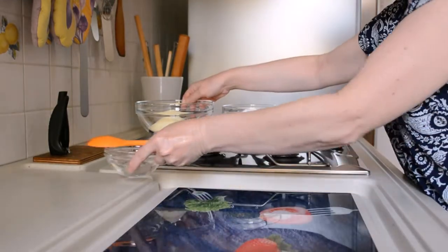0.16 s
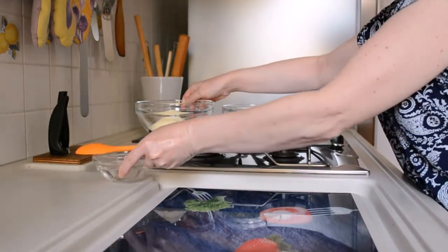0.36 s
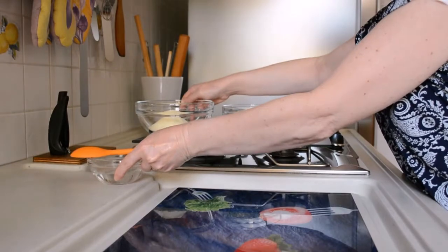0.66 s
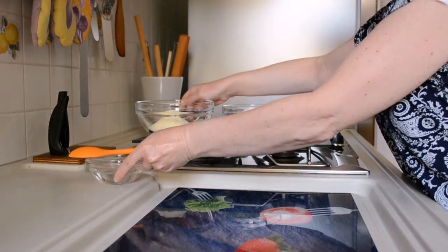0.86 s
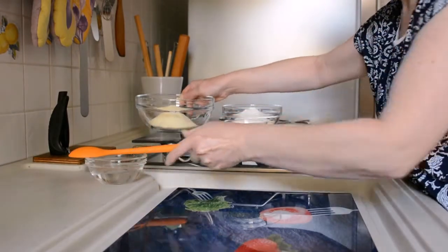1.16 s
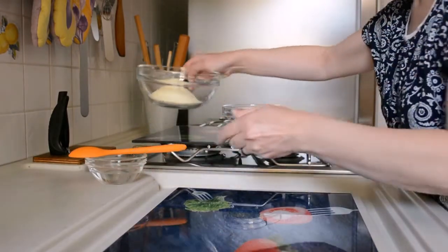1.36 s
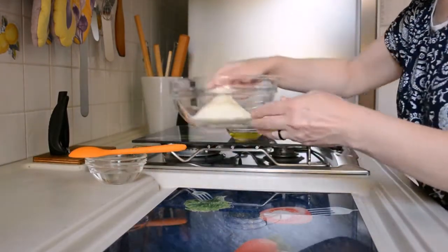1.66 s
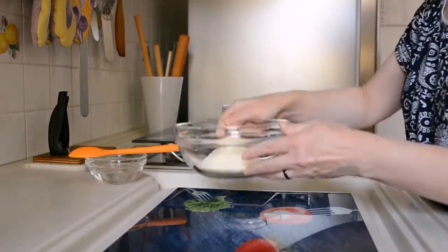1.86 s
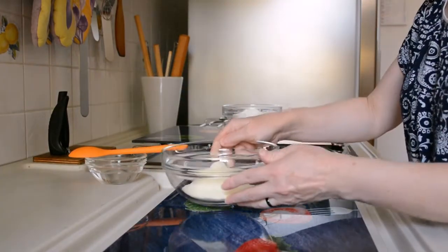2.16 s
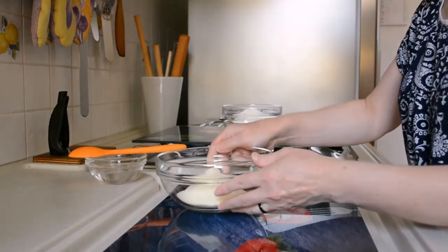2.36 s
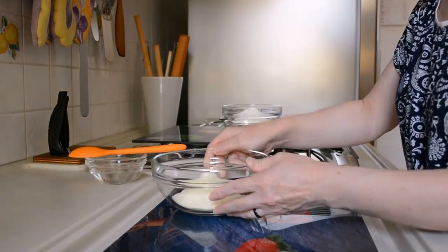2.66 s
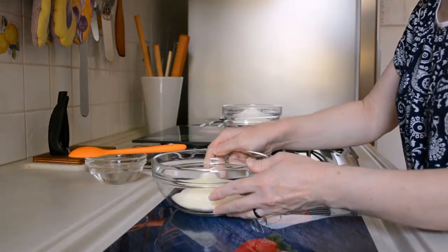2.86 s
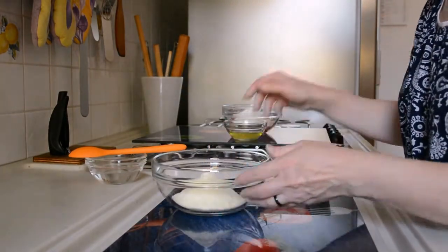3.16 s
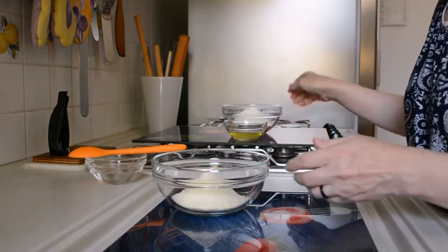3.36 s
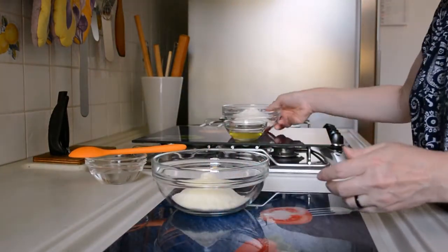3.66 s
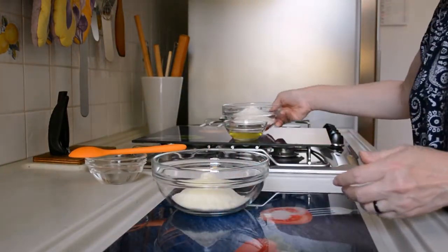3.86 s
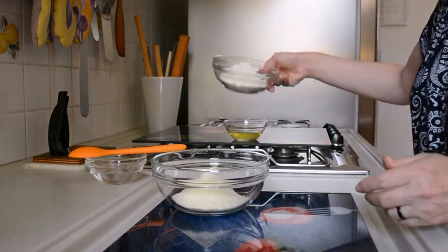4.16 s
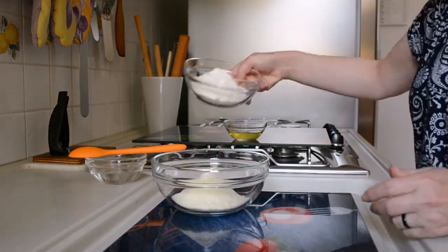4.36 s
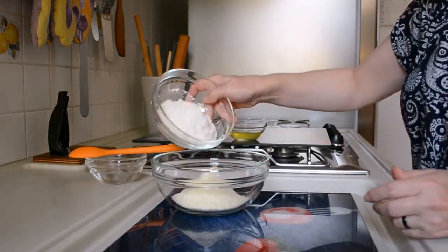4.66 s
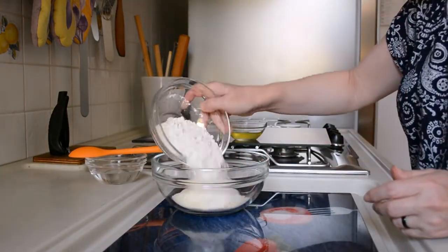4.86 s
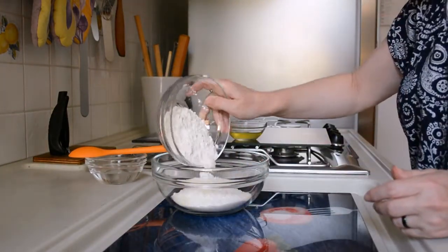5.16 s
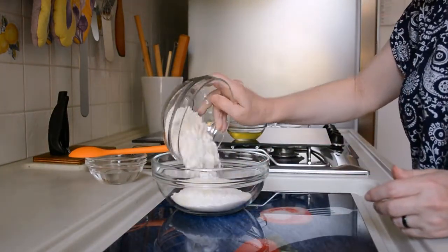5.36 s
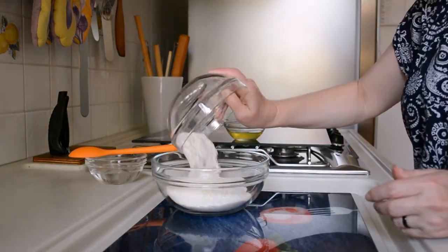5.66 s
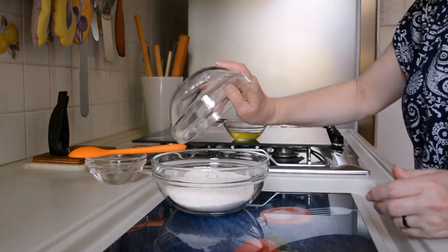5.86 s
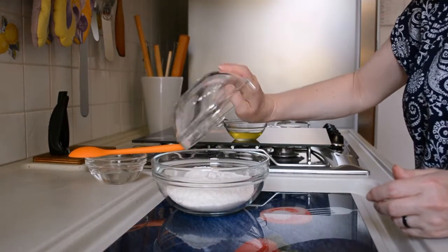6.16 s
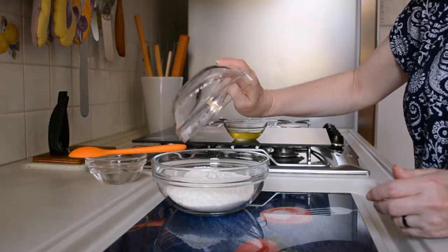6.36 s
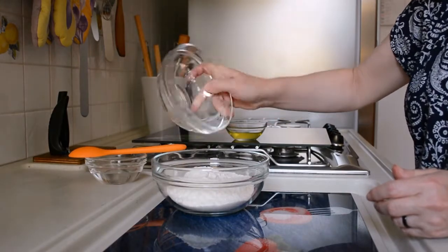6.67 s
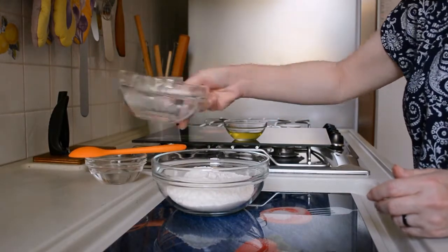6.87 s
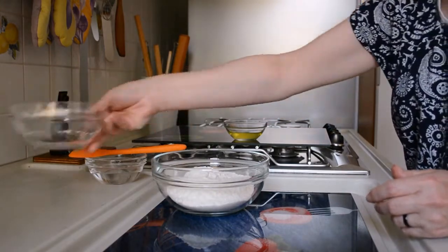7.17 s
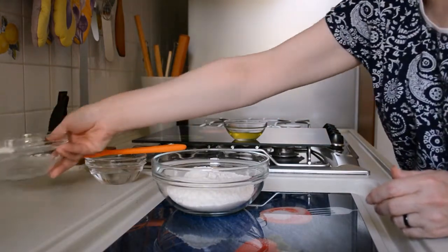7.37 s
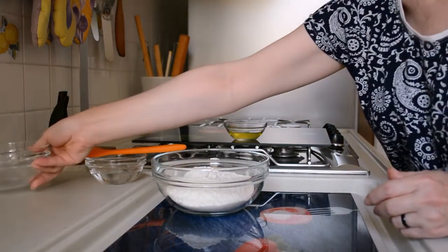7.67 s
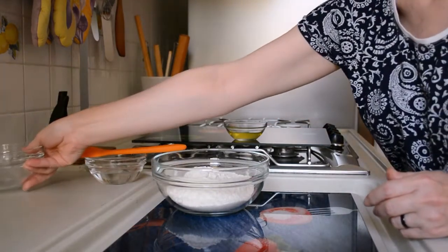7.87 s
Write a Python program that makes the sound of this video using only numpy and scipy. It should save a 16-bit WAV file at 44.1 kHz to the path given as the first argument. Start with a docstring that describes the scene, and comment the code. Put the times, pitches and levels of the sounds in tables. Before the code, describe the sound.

Over faint kitchen ventilation hum, soft dish knocks precede one hard bowl landing on a glass board and a later bright double clink.

```python
"""A large mixing bowl lands on a glass board in a tiled kitchen, then rocks and settles.
Before it a little dish is put down and nudged along the worktop, and a fingertip ticks very faintly;
after it a flour bowl clinks on the rim. Each contact is a click and a short noise knock, a ring of
fading tones and the room's answer in dying noise. Coloured noise and low tones make the ventilation hum."""
import sys
import numpy as np
from scipy import signal
from scipy.fft import rfft, irfft, next_fast_len
from scipy.io import wavfile

SR = 44100
rng = np.random.default_rng(int(sys.argv[2]) if len(sys.argv) > 2 else 0)


def log_audio(samples):
    """Write samples as a 16-bit WAV file to the path given in sys.argv[1]."""
    # one column per channel
    frames = np.atleast_2d(samples).T
    # limit to full scale, then quantise
    limited = np.clip(frames, -1, 1)
    pcm = np.round(limited * 32767).astype(np.int16)
    wavfile.write(sys.argv[1], SR, pcm)


N = 352800

# the mixing bowl lands, then rocks and settles: (t/s, knock level/dB, ring level/dB, knock dull above f/Hz)
BOWL_HITS = [(2.7995, -7.3, -16.3, 14800), (2.8095, -15, -38, 3000), (3.082, -34.5, -42, 2500),
             (3.091, -33, -43, 2200)]
# ringing tones of the mixing bowl: (f/Hz, relative level/dB, time to fall 60 dB t/s)
BOWL_MODES = [(577, -23, 0.6), (608, -21, 0.64), (743, -22, 0.73), (890, 0, 0.61), (1119, -13, 0.66),
              (1325, -9, 0.73), (1631, -11, 0.61), (1687, -16, 0.59), (1825, -15, 0.71), (1919, -9, 0.63),
              (2110, -15, 0.62), (2314, -19, 0.79), (2430, -14, 0.73), (2652, -16, 0.71), (2955, -20, 0.7),
              (3069, -14, 0.66), (3405, -13, 0.67), (3494, -20, 0.67), (3840, -22, 0.65), (4642, -23, 0.66),
              (5276, -26, 0.65), (5428, -20, 0.65), (6095, -28, 0.55), (6439, -31, 0.56), (6635, -31, 0.56),
              (7249, -35, 0.55), (8084, -35, 0.58), (8454, -33, 0.54), (9765, -38, 0.51),
              (11271, -34, 0.46)]


def amp(db):
    """Turn decibels into a gain."""
    return 10 ** (np.asarray(db) / 20)


def unit(x):
    """Scale to an rms (average strength) of 1."""
    return x / np.sqrt(np.mean(x ** 2) + 1e-20)


def along(points, hz):
    """Read a curve of (f/Hz, value) points on a log-frequency axis."""
    f, v = np.transpose(points)
    return np.interp(np.log(hz + 1), np.log(f), v)


def filtered(x, response):
    """Multiply the spectrum of x by a gain that depends on frequency."""
    n = x.shape[-1]
    padded = next_fast_len(n + 8192)
    spectrum = rfft(x, padded) * response(np.fft.rfftfreq(padded, 1 / SR))
    return irfft(spectrum, padded)[..., :n]


def noise(response, size):
    """Mid and side noise of the given colour, with an rms of 1 over both."""
    return unit(filtered(rng.standard_normal((2, size)), response))


def wobble(rate, size):
    """A smooth random curve that eases between random values, rate of them a second."""
    at = np.arange(size) * rate / SR
    knots = rng.standard_normal(2000)
    index = at.astype(int)
    ease = np.sin(np.pi / 2 * (at % 1)) ** 2
    return knots[index] * (1 - ease) + knots[index + 1] * ease


def stereo(pair, width):
    """Turn mid and side into left and right, with a width for each frequency."""
    side = filtered(pair[1], lambda hz: amp(along(width, hz)))
    return np.array([pair[0] + side, pair[0] - side])


def hum(level_db=-44.0, drift_db=0.62):
    """Ventilation: rushing air with narrow drones, over the steady lines of the mains and the motor."""
    # rush of moving air: (f/Hz, relative level per Hz/dB)
    air_colour = [(26, -26), (60, -18), (110, -12), (200, -6), (330, 4), (500, -1), (750, 0), (1000, -2.5),
                  (1500, -6), (2200, -14), (4000, -23), (7000, -31.5), (12000, -38), (15500, -45)]
    # narrow drones within the air: (f/Hz, width f/Hz, boost/dB)
    drones = [(99, 14, 6), (139.6, 10.4, 12), (165, 27, 9.5), (325.6, 15.6, 5.5), (363.6, 15, 5.5),
              (399.7, 12, 8), (570.4, 10.4, 4), (630, 4, 7), (738, 30, 7)]
    # stereo width of the air: (f/Hz, side minus mid level/dB)
    air_width = [(60, -19), (110, -30), (200, -23), (380, -24.5), (700, -17.5), (1290, -13.5), (2380, -6.5),
                 (4400, -2.5), (8120, 1), (15000, -3)]
    # steady lines of the mains and the motor: (f/Hz, rms level/dB)
    motor_lines = [(49, -75), (99, -67.5), (359, -59.5), (2953, -79.5), (3051, -76.5)]

    def air_gain(hz):
        boost_db = sum(db / (1 + (2 * (hz - centre) / width) ** 2) for centre, width, db in drones)
        return amp(along(air_colour, hz) + boost_db)

    # the loudness of the air drifts slowly
    air = noise(air_gain, N) * amp(level_db + drift_db * wobble(1.83, N))
    t = np.arange(N) / SR
    motor = np.zeros(N)
    for hz, db in motor_lines:
        phase = 2 * np.pi * hz * t + wobble(2.067, N)  # the phase wanders a little
        motor += np.sqrt(2) * amp(db) * np.sin(phase)
    return stereo(air, air_width) + motor


def dying(x):
    """Reverberation: each frequency of x dies away at the kitchen's own speed."""
    # reverberation of the kitchen: (f/Hz, time to fall 60 dB t/s)
    kitchen = [(100, 1), (500, 0.86), (1400, 0.73), (3600, 0.7), (6000, 0.6), (11000, 0.55)]
    hz, t, z = signal.stft(x, SR, nperseg=256)
    fade = amp(-60 * t / along(kitchen, hz)[:, None])
    return signal.istft(z * fade, SR, nperseg=256)[1][:, :x.shape[-1]]


def softened(hz, dull_hz):
    """A softer contact excites less treble: the gain falls away above dull_hz."""
    return 1 / np.sqrt(1 + (hz / dull_hz) ** 4)


def body(colour, modes, peak_gain, quality=110):
    """Response of a struck bowl, (Hz, gain): its broad colour, peaking at each ringing tone."""
    hz = np.arange(0, SR / 2, 2)
    peaks = sum(1 / (1 + (2 * quality * (hz / centre - 1)) ** 2) for centre, db, t60 in modes)
    return hz, amp(along(colour, hz)) * np.sqrt(1 + peak_gain ** 2 * peaks)


def click(spectrum):
    """First arrival of a blow: a coloured pulse of peak 1 with nothing ahead of it, one second long."""
    # folding the cepstrum (spectrum of the log spectrum) puts the energy as early as possible
    cepstrum = irfft(np.log(spectrum(np.fft.rfftfreq(SR, 1 / SR)) + 1e-6))
    pulse = irfft(np.exp(rfft(2 * cepstrum[:SR // 2], SR)))
    return pulse / np.abs(pulse).max()


def ring(modes, dull_hz, t, fade_rate=24, pair_hz=8):
    """Glass tones: each is a close, beating pair, and reflections from the tiles make it swell and fade."""
    # how the tones swell and fade: (share of reflections, share of the beating twin)
    shimmer = (.42, .3)
    echo_share, twin_share = shimmer
    out = np.zeros((2, len(t)))
    for hz, db, t60 in modes:
        mid_phase, side_phase, twin_phase = rng.uniform(0, 2 * np.pi, 3)
        pace = np.sqrt(hz / 1000)  # higher tones shimmer faster
        twin_hz = pair_hz * pace * rng.uniform(-0.98, 1)  # distance of the twin from the tone
        twin = twin_share * np.exp(1j * (2 * np.pi * twin_hz * t + twin_phase))
        echoes = echo_share * (wobble(fade_rate * pace, len(t)) + 1j * wobble(fade_rate * pace, len(t)))
        level = amp(db - 60 * t / t60) * softened(hz, dull_hz)
        tone = level * (1 + twin + echoes) * np.exp(2j * np.pi * hz * t)
        out += np.real(np.exp(1j * np.array([[mid_phase], [side_phase]])) * tone)
    return out / np.sqrt(1 + twin_share ** 2 + 2 * echo_share ** 2)


def contacts(hits, colour, modes, click_db, knock_t60, room_db, peak_gain, hold, ring_reach,
             build=0.0092, attack=0.00063):
    """Each contact: a click, a dense and quickly damped knock, its reverberation, and the ring of the glass.

    knock_t60, build and attack are in seconds; click_db and room_db are relative to the knock.
    """
    out, t = np.zeros((2, N + SR)), np.arange(SR) / SR
    response = body(colour, modes, peak_gain)
    for s, knock_db, ring_db, dull_hz in hits:
        spectrum = lambda hz: np.interp(hz, *response) * softened(hz, dull_hz)
        # with hold above 1, chatter and the nearest tiles hold the knock up before it drops
        knock = noise(spectrum, SR) * amp(-60 * (t / knock_t60) ** hold)
        # the diffuse sound builds up as reflections multiply
        room = dying(noise(spectrum, SR)) * (1 - np.exp(-t / build))
        # ring_reach sets how far into the treble the ring goes, compared with the knock
        glass = ring(modes, ring_reach * dull_hz, t)
        sound = amp(knock_db) * (knock + amp(room_db) * room) + amp(ring_db) * glass
        sound *= 1 - np.exp(-t / attack)
        sound[0] += amp(knock_db + click_db) * click(spectrum)  # the click is in the middle only
        out[:, round(s * SR):][:, :SR] += sound
    return out[:, :N]


def finger():
    """A fingertip ticks on the mixing bowl: a very weak, bright contact."""
    # the tick: (t/s, knock level/dB, ring level/dB, dull above f/Hz)
    hits = [(2.06, -61, -75, 15000)]
    # colour of the tick: (f/Hz, relative level per Hz/dB)
    colour = [(500, -20), (8500, -12), (10000, -6), (12000, -4), (14000, -14)]
    return contacts(hits, colour, BOWL_MODES, click_db=0, knock_t60=.06, room_db=-4,
                    peak_gain=1.5, hold=1, ring_reach=1)


def nudge(s, db, rise_db_per_s=230, fall_db_per_s=165):
    """Rubbing level of one nudge: the dish gathers speed quickly, then coasts to rest."""
    t = np.arange(N) / SR - s
    return amp(db + np.minimum(rise_db_per_s * t, -fall_db_per_s * t))


def slide(judder_db=2.0, judder_rate=110):
    """With each nudge the foot of the dish judders over the worktop, which colours the rubbing."""
    # the hand nudges the dish along: (t of greatest speed/s, level/dB)
    nudges = [(1.003, -32), (1.112, -37)]
    # colour of the rubbing: (f/Hz, relative level per Hz/dB)
    slide_colour = [(80, -41), (230, -16), (380, 11), (650, 4.5), (1000, 3), (1700, -8.5), (3000, -18),
                    (6000, -42), (14000, -52)]
    level = np.max([nudge(s, db) for s, db in nudges], axis=0)
    friction = rng.standard_normal((2, N)) * amp(judder_db * wobble(judder_rate, N))
    return level * unit(filtered(friction, lambda hz: amp(along(slide_colour, hz))))


def dish():
    """The little dish meets the worktop: short, mostly dull knocks with a faint ring."""
    # the contacts: (t/s, knock level/dB, ring level/dB, knock dull above f/Hz)
    hits = [(.809, -34, -45.5, 9000), (.8515, -24, -58, 2500), (1.0055, -26.5, -61, 1880),
            (1.028, -33, -58, 2500), (1.118, -39, -56, 1300)]
    # ringing tones of the dish: (f/Hz, relative level/dB, time to fall 60 dB t/s)
    modes = [(1655, -7, .2), (3240, 1, 0.17), (4400, -3, 0.055), (4630, -12, 0.12), (6940, -14, 0.19),
             (10320, -9, 0.36), (10460, -18, 0.29)]
    # colour of the knocks: (f/Hz, relative level per Hz/dB)
    colour = [(50, -43), (150, -12), (400, -4.5), (800, 6), (1250, -1), (2000, -9), (3200, -15.5),
              (5000, -24.5), (8000, -32), (14000, -30)]
    return contacts(hits, colour, modes, click_db=7.5, knock_t60=0.028, room_db=-8.0,
                    peak_gain=3.3, hold=2.0, ring_reach=8.9)


def rim():
    """The flour bowl strikes the rim and rebounds: two clinks with a strong ring."""
    # the strikes: (t/s, knock level/dB, ring level/dB, knock dull above f/Hz)
    hits = [(5.204, -13.8, -24.5, 14000), (5.272, -24.5, -39, 9000)]
    # ringing tones of the clink: (f/Hz, relative level/dB, time to fall 60 dB t/s)
    modes = [(738, -17, 0.79), (873, -8, 0.79), (1288, -4, 0.73), (1377, -11, 0.71), (1464, -11, 0.69),
             (1501, -3, 0.7), (1709, -10, 0.77), (1765, -15, 0.77), (1935, -5, 0.66), (2105, -10, 0.7),
             (2197, -12, 0.69), (2517, -8, 0.67), (2728, -14, 0.75), (2790, -14, 0.75), (3376, -12, 0.73),
             (3482, -1, 0.74), (3563, -11, 0.74), (3804, -16, 0.7), (3940, -15, 0.73), (4829, -16, 0.63),
             (5262, 0, 0.62), (7318, -6, 0.51), (9550, -30, 0.55), (9824, -31, 0.55), (10705, -30, 0.53),
             (11339, -22, 0.51), (13178, -35, 0.4), (14861, -47, 0.4)]
    # colour of the knocks: (f/Hz, relative level per Hz/dB)
    colour = [(30, -50), (160, -12), (550, -11.5), (1000, 4.5), (1550, -1.5), (2400, 1.5), (3000, -5),
              (3700, -0.5), (4400, -16.5), (5300, -3), (6400, -22), (8600, -30), (11500, -25), (14500, -41)]
    return contacts(hits, colour, modes, click_db=8, knock_t60=0.12, room_db=-6.5,
                    peak_gain=2, hold=1.18, ring_reach=0.97)


def thump(hz=72, db=-49, t60=0.58, rise=0.013):
    """The heavy bowl sets the worktop swinging: a low tone that swells quickly and dies away."""
    t = np.maximum(np.arange(N) / SR - BOWL_HITS[0][0], 0)  # silent until the bowl lands
    return amp(db - 60 * t / t60) * (1 - np.exp(-t / rise)) * np.sin(2 * np.pi * hz * t)


def bowl():
    """The mixing bowl lands on the glass board: the hardest blow, then small ones as it settles."""
    # colour of the knocks: (f/Hz, relative level per Hz/dB)
    colour = [(45, -52), (90, -26), (200, -19), (450, -22.5), (850, 2), (1350, 2), (2100, -4), (3400, -4),
              (4900, -17), (5500, -14.5), (7300, -30), (11300, -32), (13000, -40), (15500, -52)]
    return contacts(BOWL_HITS, colour, BOWL_MODES, click_db=6.5, knock_t60=0.042, room_db=-10,
                    peak_gain=1.44, hold=1.8, ring_reach=1.1)


def scene():
    """All the glassware shares one stereo width; the thump and the hum are added to it."""
    # stereo width of the contacts and the sliding: (f/Hz, side minus mid level/dB)
    hit_width = [(200, -32), (1200, -23.5), (2800, -17), (5000, -16), (7400, -7), (9500, 1), (12000, -16)]
    glassware = finger() + slide() + dish() + rim() + bowl()
    return stereo(glassware, hit_width) + thump() + hum()


def record(dry, low_cut_hz=34, top_hz=15750):
    """The loudest peaks are rounded off at full scale; the deepest bass and the top treble are cut."""
    rounded = dry / (1 + np.abs(dry) ** 8) ** (1 / 8)
    low_cut = signal.butter(2, low_cut_hz, "highpass", fs=SR, output="sos")
    without_bass = signal.sosfilt(low_cut, rounded)
    return filtered(without_bass, lambda hz: 1 / (1 + (hz / top_hz) ** 200))


dry = scene()
out = record(dry)
log_audio(out)
```